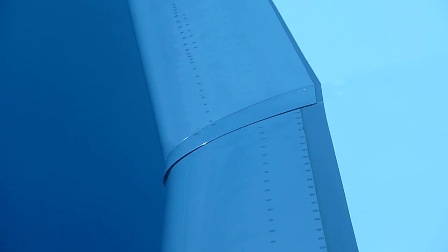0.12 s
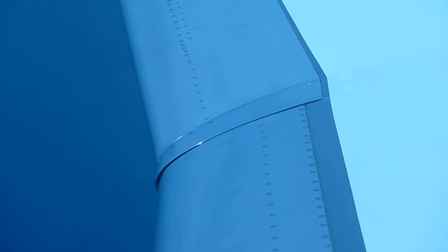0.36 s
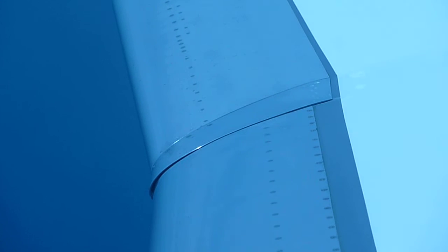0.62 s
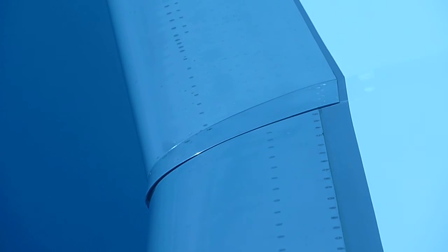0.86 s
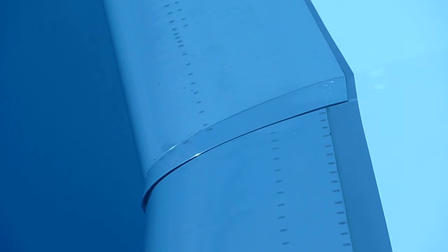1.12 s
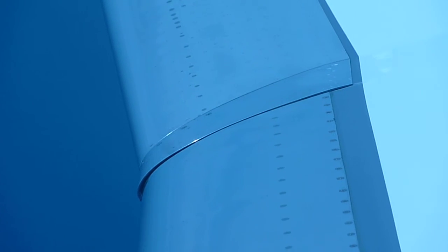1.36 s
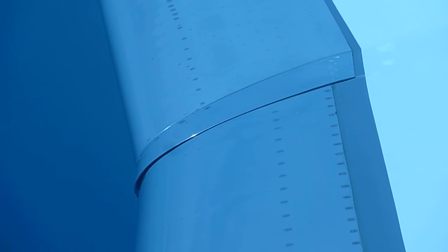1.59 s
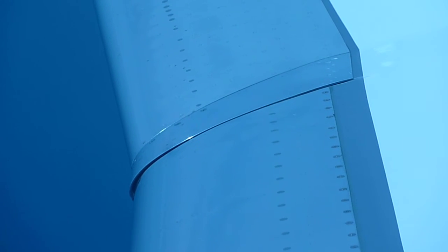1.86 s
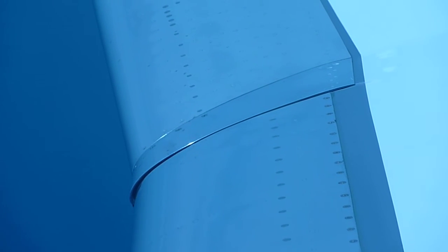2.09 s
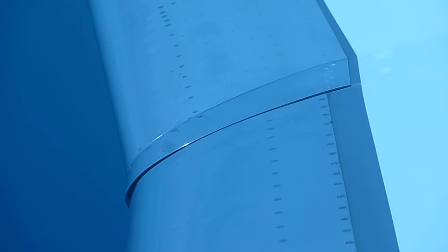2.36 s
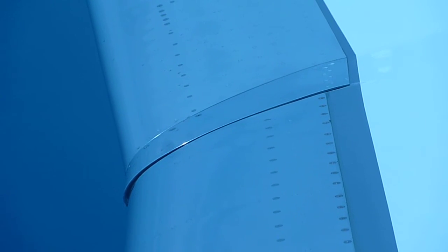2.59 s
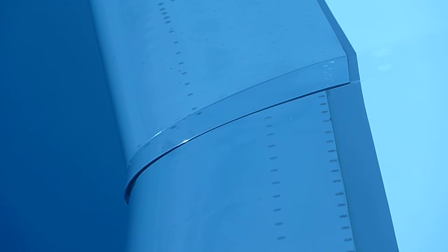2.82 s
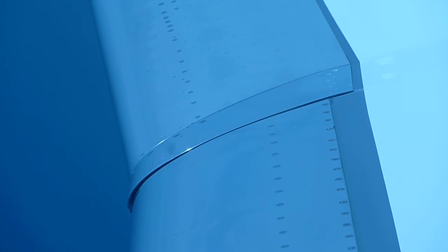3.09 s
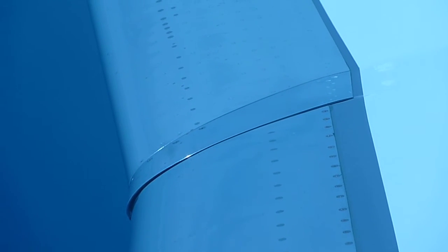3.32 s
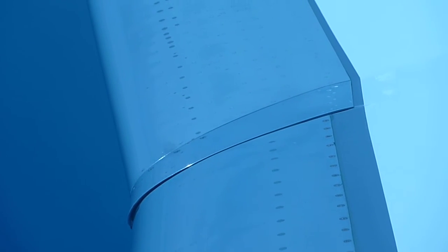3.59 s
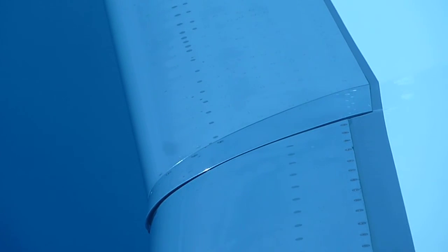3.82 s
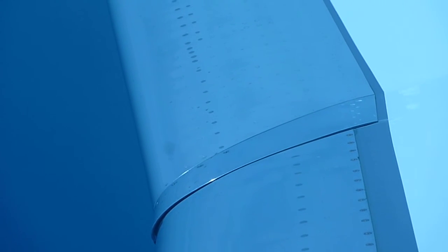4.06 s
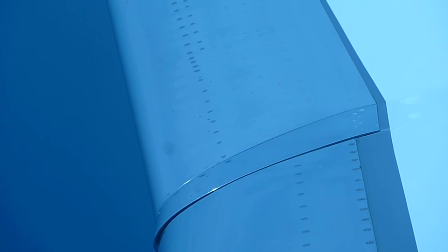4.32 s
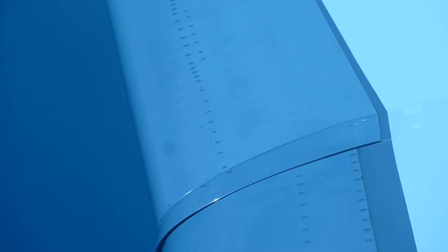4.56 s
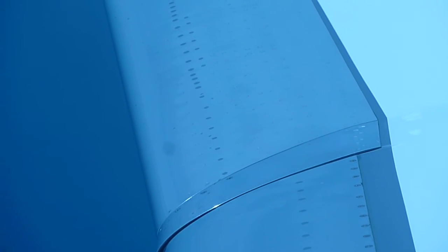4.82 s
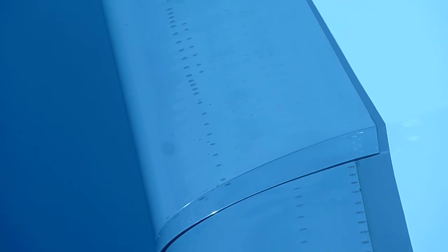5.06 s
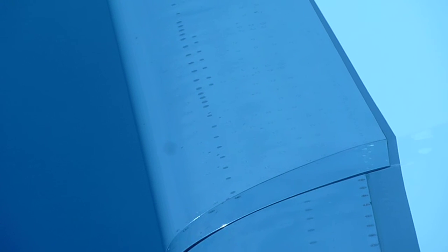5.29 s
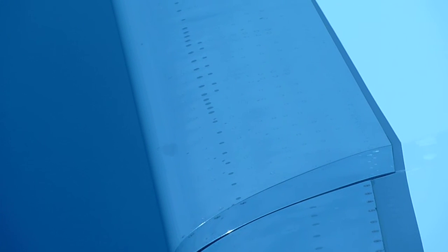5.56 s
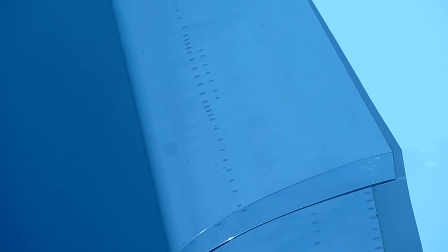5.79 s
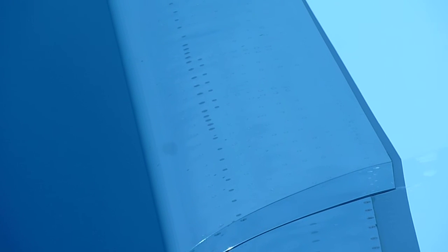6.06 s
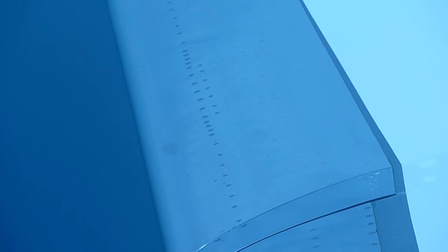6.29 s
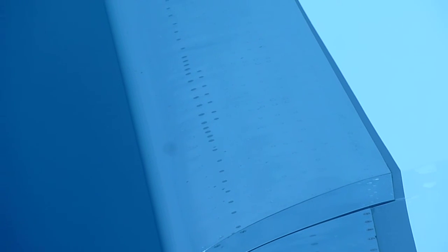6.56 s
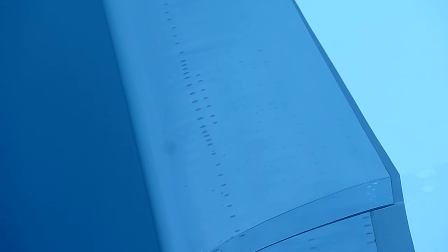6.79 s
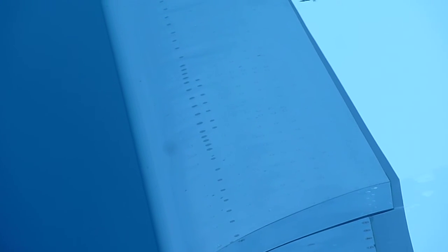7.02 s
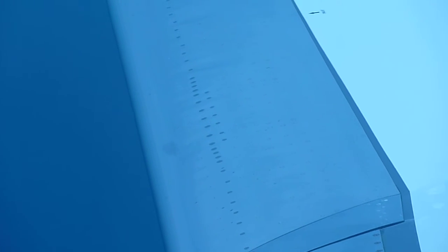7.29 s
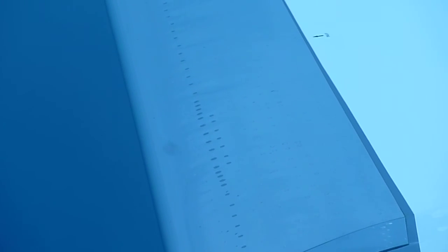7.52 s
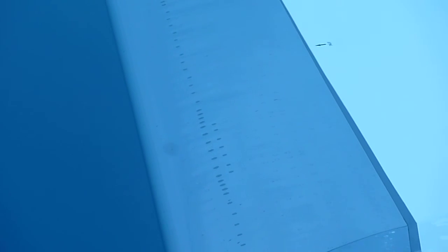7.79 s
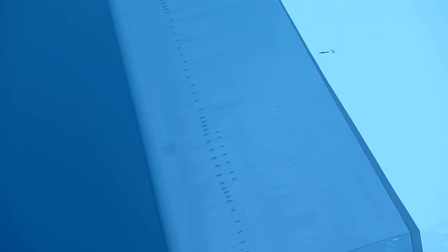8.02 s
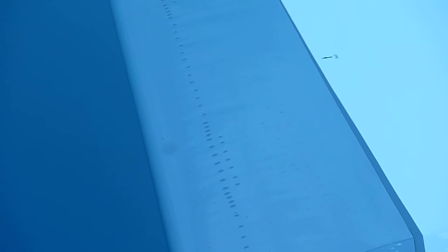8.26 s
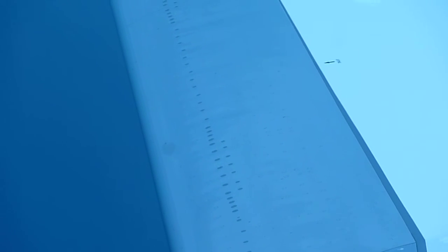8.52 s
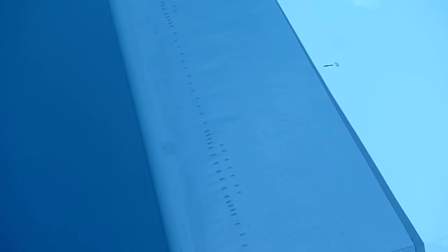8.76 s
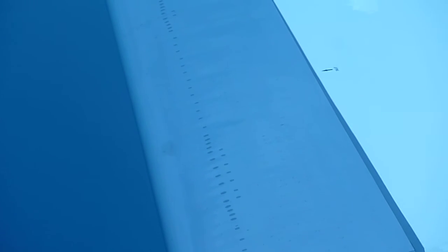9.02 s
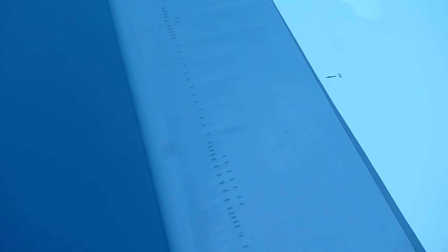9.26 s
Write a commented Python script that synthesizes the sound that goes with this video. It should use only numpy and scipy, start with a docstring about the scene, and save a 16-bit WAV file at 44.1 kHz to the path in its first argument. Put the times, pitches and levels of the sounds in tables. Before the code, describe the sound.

Inside a cruising jet, muffled airflow roars constantly over a low fading drone, with faint high whines and a small camera's grainy hiss.

```python
"""Air rushes along the skin of a small jet at cruise: a broad roar of shaped, drifting noise.
Under it a fan shaft hums near 100 Hz, a gliding sine that drifts lower in level with dips on the way.
Thin turbine whines from 1.3 to 2.2 kHz are narrow bands of noise; faint mirror lines sit just below 8 kHz.
A small camera by the window adds a treble hiss of coarse quantising that follows the roar's slope,
notches the treble, samples at 16 kHz with mirror images, carries an offset and steps its gain up once."""
import sys
import numpy as np
from scipy import signal
from scipy.fft import rfft, irfft
from scipy.io import wavfile
from scipy.ndimage import uniform_filter1d

SR = 44100
rng = np.random.default_rng(int(sys.argv[2]) if len(sys.argv) > 2 else 0)


def convert_level_to_amplitude(level_db):
    """Map a level in decibels to its linear amplitude factor."""
    exponent = np.asarray(level_db, float) / 20
    return 10 ** exponent


def pcm_store(signal):
    """Save signal as 16-bit PCM."""
    levels = np.round(np.clip(np.atleast_2d(signal), -1, 1) * 32767)
    wavfile.write(sys.argv[1], SR, levels.astype(np.int16).T)


N = 413658

# Roar through the cabin wall, before the resonances.
# Each row: frequency in Hz, relative density in dB per Hz.
WALL_SPECTRUM = [(20, -36.5), (50, -21.5), (90, -6), (150, -0.5), (185, -4), (215, 0), (290, -1), (370, -6),
                 (430, -11.5), (800, -17), (1100, -23.5), (1850, -31), (2200, -37), (2500, -43.5)]
# Treble hiss of the camera's coarse quantising, before the resonances.
# Each row: frequency in Hz, relative density in dB per Hz.
QUANTISING_SPECTRUM = [(1500, -22), (2500, -1.5), (3500, -1), (4000, -2.5), (5000, 0.5), (6500, -3.5),
                       (7200, -9.5), (7800, -9), (8200, -15.5)]
# Thin lines: turbine whines from 1287 to 2163 Hz, then two faint mirror lines just below 8 kHz,
# left by the camera's sampling.
# Each row: centre in Hz, nominal width in Hz, level in dB relative to the roar.
THIN_LINES = [(1287, .8, -34), (1924, 12, -26.7), (2049, 16, -33.5), (2142, 6, -43), (2163, 16, -38),
              (7709, 45, -57), (7917, 5, -69)]
# Resonances of cabin and wall panels.
# Each row: centre in Hz, full width in Hz at half the boost, boost in dB.
CABIN_RESONANCES = [(152, 27, 1.5), (213.7, 25, 2.5), (276.3, 17, 3), (357.4, 27, 3), (563, 110, 3.5),
                    (693, 82, 3.5), (847, 46, 4), (1084, 51, 2.5), (1410, 55, 2), (3900, 100, 3)]
# Level of the hum ahead of notches and gain step: drifting lower over time,
# with dips as where it beats against the noise. Each row: time in seconds, level in dB.
HUM_LEVELS = [(0, -26), (3, -27), (5, -29), (5.55, -27.5), (6.1, -37.5), (7.8, -31), (8.2, -35.5),
              (8.6, -30.5), (9.38, -35)]
# Notches of the camera's treble filter. Each row: centre in Hz, half width in Hz at -3 dB.
TREBLE_NOTCHES = [(3000, 453), (4400, 340), (8000, 310)]
# Roll-off of the mirror images above half the sampling rate. Each row: frequency in Hz, gain in dB.
IMAGE_ROLLOFF = [(7000, 0.5), (8000, -3), (8300, -11), (8700, -21.5), (9000, -37.5), (9300, -60)]

HISS_DB = -30.5  # relative to the roar
# the fan shaft's speed settles after a small throttle change
SHAFT_HZ, SURPLUS_HZ, SETTLE_S = 99.7, 2.702, 1.606
# the rush grows slowly, with one broad swell; levels ahead of notches and gain step
RUSH_START_DB, GROWTH_DB_PER_S = -24.5, 0.22
SWELL_AT_S, SWELL_WIDTH_S, SWELL_DB = 6.45, 0.24, 1.3
# the camera
HALF_RATE_HZ = 8000
GAIN_STEP_AT_S, GAIN_STEP_DB = 2.147, 2.0
OFFSET = -0.027  # as a share of full scale, ahead of the gain step


def evened(x):
    """Scales to rms 1."""
    return x / np.sqrt(np.mean(x ** 2) + 1e-20)


def read_spectrum(points, hz):
    """Reads a spectrum table in dB along a log-frequency axis."""
    f, db = np.transpose(points)
    return np.interp(np.log(hz + 1), np.log(f + 1), db)


def coloured_noise(spectrum, flicker_db, patchy_db, long, wide):
    """Noise from random short-time spectra with drifting patches, coloured by the cabin's resonances.

    long and wide set the size of the patches, in frames of 512 samples and in frequency bins."""
    hz = np.fft.rfftfreq(2048, 1 / SR)
    real, imag, patches = rng.standard_normal((flicker_db.shape[1], 1025, 3)).T
    patches = uniform_filter1d(patches, wide, axis=0)
    patches = evened(uniform_filter1d(patches, long, axis=1))
    colour_db = read_spectrum(spectrum, hz)
    for centre_hz, width_hz, db in CABIN_RESONANCES:
        colour_db = colour_db + db / (1 + (2 * (hz - centre_hz) / width_hz) ** 2)
    reach = np.clip(hz / 900, 0, 1)[:, None]  # the flicker spares the bass
    level_db = colour_db[:, None] + patchy_db * patches + reach * flicker_db
    frames = (real + 1j * imag) * convert_level_to_amplitude(level_db)
    return evened(signal.istft(frames, nperseg=2048, noverlap=1536)[1][:N])


def quantising_hiss(roar, flicker):
    """Treble hiss of the camera's coarse quantising, louder where the roar swings fastest."""
    hiss = coloured_noise(QUANTISING_SPECTRUM, 0.5 * flicker, patchy_db=0.67, long=8, wide=30)
    swing = uniform_filter1d(evened(np.gradient(roar)) ** 2, size=60)
    return convert_level_to_amplitude(HISS_DB) * evened(hiss * np.sqrt(1 + 0.38 * abs(swing)))


def whines_and_mirror_lines():
    """Narrow bands of noise, swells partly evened: each line flutters at a pace set by its width."""
    hz = np.fft.fftfreq(N, 1 / SR)
    out = 0
    for centre_hz, width_hz, db in THIN_LINES:
        noise = np.fft.fft(rng.standard_normal(N))
        # almost only positive frequencies, so that abs(line) follows the envelope
        line = np.fft.ifft(noise / (1 + 2j * (hz - centre_hz) / width_hz) ** 1.4)
        steadier = (line / abs(line) ** 0.3).real
        out = out + convert_level_to_amplitude(db) * evened(steadier)
    return out


def shaft_hum():
    """One clean shaft order, a sine that glides down towards its settled speed."""
    t = np.arange(N) / SR
    hz = SHAFT_HZ + SURPLUS_HZ * np.exp(-t / SETTLE_S)
    times, levels = np.transpose(HUM_LEVELS)
    level_db = np.interp(t, times, levels)
    cycles = np.cumsum(hz) / SR + rng.random()
    return np.sqrt(2) * convert_level_to_amplitude(level_db) * np.sin(2 * np.pi * cycles)  # sqrt(2): a sine of rms 1


def air_rush(flicker):
    """Broad roar of turbulent air, dulled by its way through the cabin wall."""
    wall = WALL_SPECTRUM + [(4000, -75), (6000, -120)]  # keeps the roar out of the treble
    return coloured_noise(wall, 0.79 * flicker, patchy_db=0.92, long=40, wide=3)


def scene():
    """Roar, hiss and thin lines share one level; the hum has its own. Both ends are eased over 3 ms."""
    t = np.arange(N) / SR
    swell_db = SWELL_DB * np.exp(-((t - SWELL_AT_S) / SWELL_WIDTH_S) ** 2)
    level_db = RUSH_START_DB + GROWTH_DB_PER_S * t + swell_db
    flicker = uniform_filter1d(rng.standard_normal((1, N // 512 + 5)), size=8)
    flicker = evened(flicker)  # shared by roar and hiss
    roar = air_rush(flicker)
    noises = roar + quantising_hiss(roar, flicker) + whines_and_mirror_lines()
    mix = convert_level_to_amplitude(level_db) * noises + shaft_hum()
    ends = signal.windows.tukey(N, 264 / N)
    return (ends * mix)[None]


def notch_treble(z, hz):
    """Each notch cancels its centre frequency and thins the sound around it."""
    for centre_hz, half_width_hz in TREBLE_NOTCHES:
        away = 1j * (hz - centre_hz)
        z = z * away / (half_width_hz + away)
    return z


def mirror_images(z, hz):
    """Sampling at 16 kHz folds the spectrum up around 8 kHz; a roll-off fades the images."""
    half = round(HALF_RATE_HZ * N / SR)
    z[:, half + 1:2 * half] = z[:, half - 1:0:-1].conj()
    z[:, 2 * half:] = 0
    return z * convert_level_to_amplitude(read_spectrum(IMAGE_ROLLOFF + [(10000, -150)], hz))


def gain_step():
    """The camera's gain steps up once, within about 10 ms."""
    stepped_up = 1.0 * (np.arange(N) > GAIN_STEP_AT_S * SR)
    return convert_level_to_amplitude(GAIN_STEP_DB * uniform_filter1d(stepped_up, size=500))


def band_limit(x):
    """A steep low-pass at the top of the band."""
    return signal.sosfilt(signal.butter(12, 8730, fs=SR, output="sos"), x)


def record(dry):
    """The camera: treble notches, 16 kHz sampling with mirror images, offset and gain step."""
    hz = np.fft.rfftfreq(N, 1 / SR)
    notched = notch_treble(rfft(dry), hz)
    sampled = irfft(mirror_images(notched, hz), N)
    mix = (sampled + OFFSET) * gain_step()
    return band_limit(mix)


dry = scene()
out = record(dry)
pcm_store(out)
```